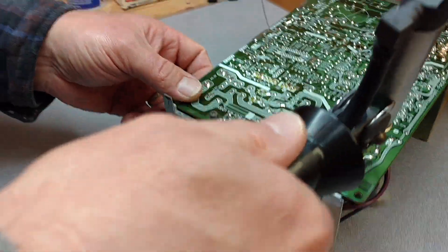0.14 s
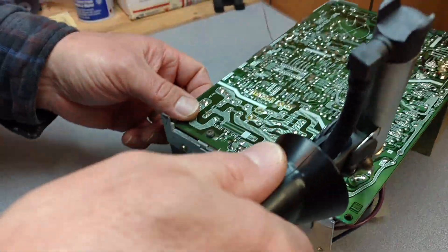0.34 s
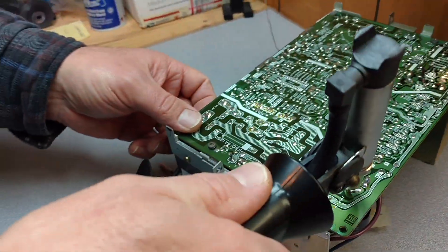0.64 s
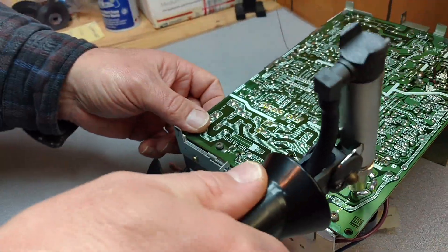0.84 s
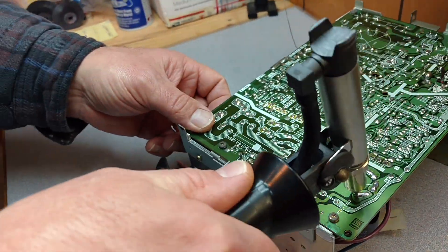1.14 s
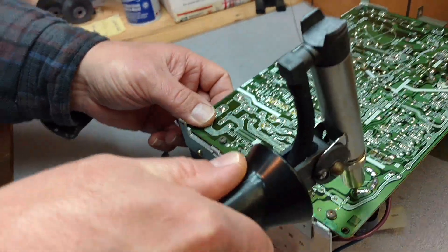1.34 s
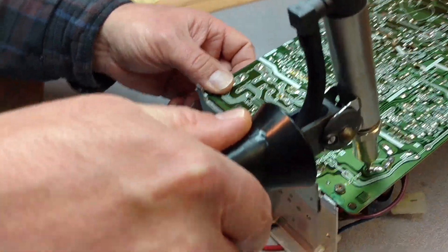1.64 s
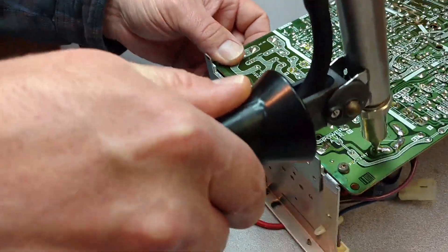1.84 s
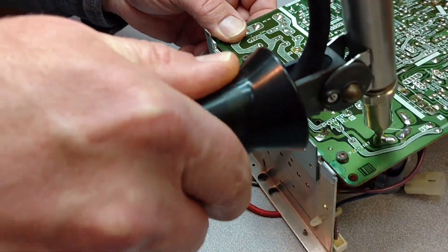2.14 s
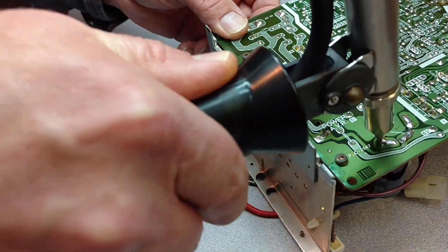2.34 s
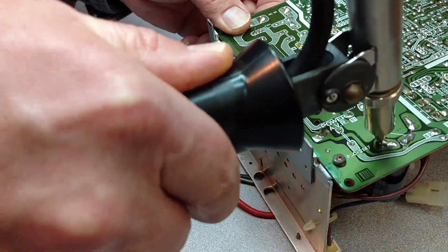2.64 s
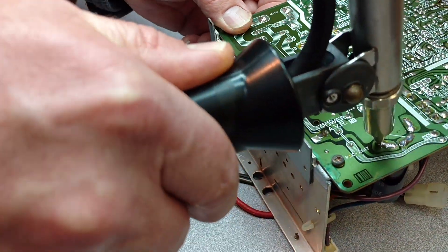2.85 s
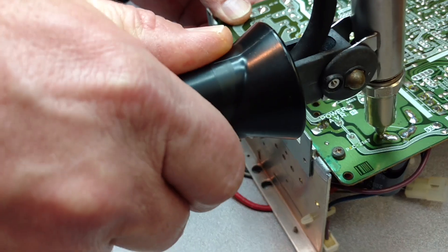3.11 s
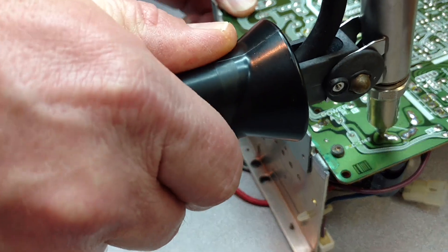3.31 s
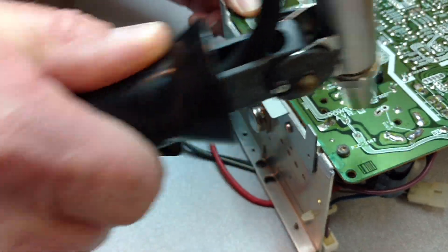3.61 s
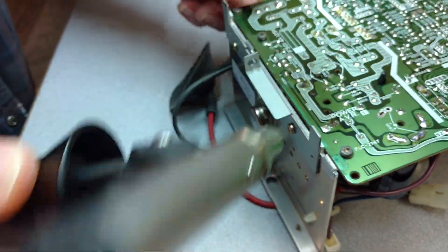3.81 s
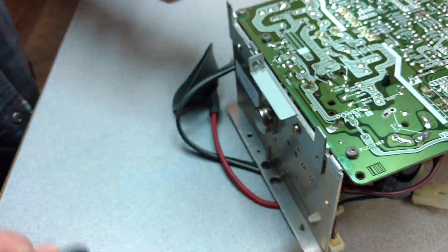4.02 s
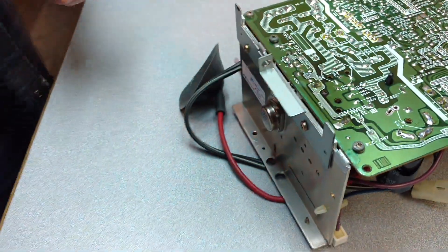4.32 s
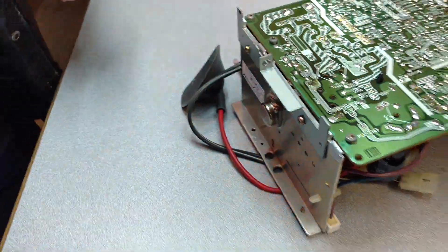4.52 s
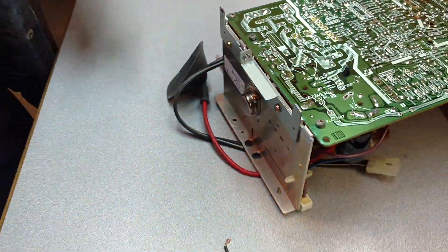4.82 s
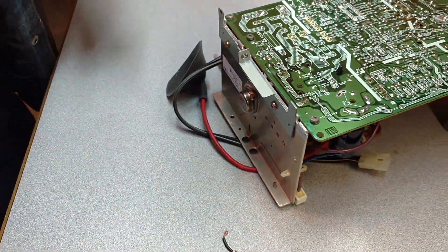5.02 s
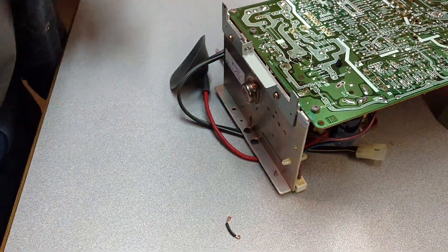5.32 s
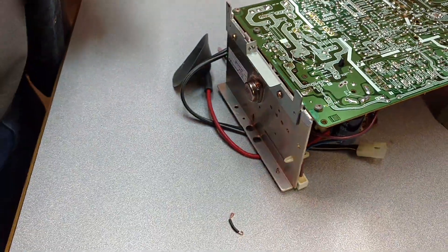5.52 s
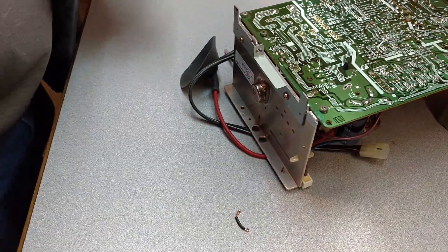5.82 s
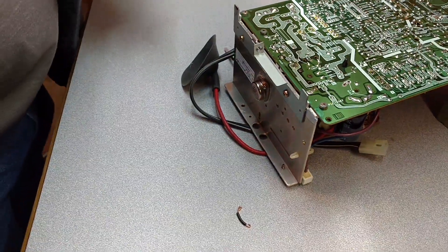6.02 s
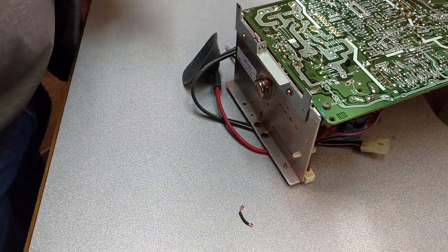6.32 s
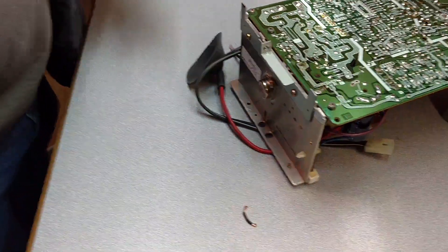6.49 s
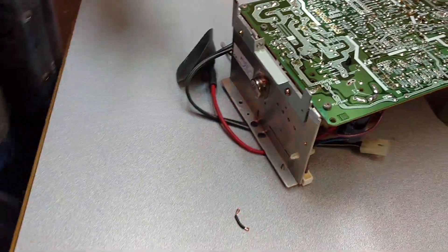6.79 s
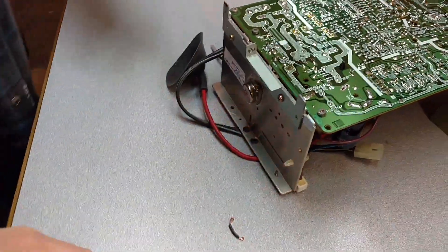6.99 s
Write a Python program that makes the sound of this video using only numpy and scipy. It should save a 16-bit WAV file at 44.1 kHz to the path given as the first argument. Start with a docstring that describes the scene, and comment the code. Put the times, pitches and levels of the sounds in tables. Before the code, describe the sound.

Close stereo microphones at a workbench in a small, dry room. From 0 s a desoldering gun's pump drones at about 52 strokes a second, a low, nasal buzz with fluttering puffs of valve air, over a fan's tonal rush and mains hum. Faint solder ticks come at 0.2, 0.5 and 1.4 s. At 3.06 s the solder tears loose in a bright, crackling slurp with a gush of air; the pump slows slightly and turns to a looser double slap. A very sharp, thin snap at 3.36 s ducks everything, which creeps back amid airy hiss and high whistles. At 4.5 s the draught chokes; the pump's resonance sweeps upward and it labours, speeding up. Hard metallic knocks at 5.7 s, lighter ones at 5.85, then a clatter and short falling skid at 6.1-6.25 as the motor switches off and coasts down, stopping by 6.4. Fan and hum remain; from 6.7 s a sleeve rubs grainily over the bench until the end.

```python
"""At a workbench, close stereo microphones hear a desoldering gun's pump throb some 52 strokes a second,
its nozzle sealed on a joint; a fan's rush and a mains hum lie behind. The solder slurps away, the nozzle snaps
off the lead and hisses open, then clogs and the pump loads up. The gun clatters into its stand, the motor
coasts down and a sleeve slides over the bench. Pump and valves are pulse trains, air is coloured noise,
knocks are cracks with rings; a limiter ducks everything at each sharp crack and creeps back."""
import sys
import numpy as np
from scipy import signal
from scipy.fft import rfft, irfft
from scipy.io import wavfile
from scipy.ndimage import uniform_filter1d, minimum_filter1d

SR = 44100
rng = np.random.default_rng(int(sys.argv[2]) if len(sys.argv) > 2 else 0)


def materialize(psi):
    """Save the field psi as 16-bit PCM at rate SR to the path in sys.argv[1].

    A 1-D psi becomes a single channel; in a 2-D psi each row is a channel.
    """
    bounded = np.clip(np.atleast_2d(psi).T, -1, 1)
    quanta = np.round(bounded * 32767).astype(np.int16)
    wavfile.write(sys.argv[1], SR, quanta)


N = 315315
TIME = np.arange(N) / SR  # s

# the solder lets go, the nozzle clogs, the gun is in its stand, the motor is switched off, strokes end (s)
FREED_S, CLOG_S, PARKED_S, OFF_S, STOP_S = 3.065, 4.48, 5.72, 6.2, 6.39


def amp(db):
    """Decibels to gain."""
    return 10 ** (np.asarray(db) / 20)


def evened(x):
    """Scales to rms 1."""
    return x / np.sqrt(np.mean(x ** 2) + 1e-20)


def curve(rows, t=TIME, axis=1):
    """One column of a table, read at times t."""
    rows = np.array(rows, float)
    return np.interp(t, rows[:, 0], rows[:, axis])


def read(points, hz):
    """A spectrum, read on a log-frequency axis."""
    f, value = np.transpose(points)
    return np.interp(np.log(hz + 1), np.log(f + 1), value)


def ramp(x, start, span):
    """Rises from 0 to 1 as x goes from start to start + span."""
    return np.clip((x - start) / span, 0, 1)


def since(s):
    """Seconds gone by since s, zero before it."""
    return np.maximum(TIME - s, 0)


def add(mix, s, sound):
    """Mixes a stereo sound in at time s."""
    part = mix[:, round(s * SR):][:, :sound.shape[1]]
    part += sound[:, :part.shape[1]]


def drift(hz):
    """Slow random wander of rms 1, its spectrum falling off around hz."""
    f = np.fft.rfftfreq(N, 1 / SR)
    smooth = np.exp(-(f / hz) ** 2)
    return evened(irfft(rfft(rng.standard_normal(N)) * smooth, N))


# likeness of the two microphones in coloured noise: pitch_hz, correlation
LIKENESS = [(50, 0.098), (130, 0.78), (400, 0.82), (1300, 0.95), (2300, 0), (15000, 0)]
# lean of coloured noise to one side: pitch_hz, left_minus_right_db
LEAN = [(100, -9.5), (220, -14), (700, -0.5), (2400, -1), (5000, 0.5), (12000, 3)]


def noise(colour, size=N):
    """Coloured noise, partly shared by the two microphones; 0 dB over the whole band gives an rms near 1."""
    hz = np.fft.rfftfreq(size, 1 / SR)
    a, b = rfft(rng.standard_normal((2, size)))
    same = np.clip(read(LIKENESS, hz), -1, 1)
    lean = amp(read(LEAN, hz) / 2)
    left = a * lean
    right = (same * a + np.sqrt(1 - same ** 2) * b) / lean
    return irfft(np.array([left, right]) * amp(read(colour, hz)), size)


def narrow(hz, width_hz, size=N):
    """Stereo noise through one resonance, of rms 1."""
    off = (np.fft.rfftfreq(size, 1 / SR) - hz) / (width_hz / 2)
    return evened(irfft(rfft(rng.standard_normal((2, size))) / (1 + off ** 2), size))


def sing(rows):
    """Fuzzy tones, each a narrow noise band that swells, glides and fades."""
    out = np.zeros((2, N))
    for start, end, hz, glide_hz, width_hz, db in rows:
        size = int((end - start) * SR)
        glide = np.exp(2j * np.pi * np.cumsum(np.linspace(0, glide_hz, size)) / SR)
        tone = (signal.hilbert(narrow(hz, width_hz, size)) * glide).real
        swell = np.sin(np.linspace(0, np.pi, size))
        add(out, start, amp(db) * tone * swell)
    return out


def causal(db):
    """Spectrum of the promptest (minimum-phase) ring that has this colour."""
    log_gain = np.log(amp(np.r_[db, db[-2:0:-1]]))
    return np.exp(np.conj(signal.hilbert(log_gain)))[:len(db)]


EDGE_HZ = 15750  # upper edge of the recorded band
EMPHASIS_HZ, METER_S = 3300, .003  # where the treble starts to count extra; averaging time


def loudness(x):
    """Running level over a few milliseconds, the treble counting extra."""
    hz = np.fft.rfftfreq(x.shape[1], 1 / SR)
    weight = np.hypot(1, (hz / EMPHASIS_HZ) ** 2) * (hz < EDGE_HZ)
    sharp = irfft(rfft(x) * weight, x.shape[1])
    power = uniform_filter1d((sharp ** 2).mean(0), size=round(METER_S * SR), mode="constant")
    return np.sqrt(abs(power) + 1e-12)


def blow(colour, t60, tilt_db, crack, crack_s=0.0013, rise_s=0.0014, size=16384):
    """A sharp crack and a dense ring that builds and dies, of peak about 1."""
    t, hz = np.arange(size) / SR, np.fft.rfftfreq(size, 1 / SR)
    ring = amp(-60 * t / t60) * (1 - np.exp(-t / rise_s))
    burst = noise([(20, 0), (20000, 0)], size=size) * (ring + crack * np.exp(-t / crack_s))
    tilt = tilt_db * np.log2(np.maximum(hz, 1000) / 1000)
    sound = irfft(rfft(burst) * causal(read(colour, hz) + tilt))
    return sound / np.sort(abs(sound).ravel())[-6]  # a few stray samples may go above 1


def workshop(x, t60=0.15, wet_db=-14):
    """A short diffuse tail of decaying noise from the small room."""
    t = np.arange(SR // 3) / SR
    tail = rng.standard_normal((2, len(t))) * amp(-60 * t / t60) * (t > .006)
    tail /= np.linalg.norm(tail[0])
    return x + amp(wet_db) * signal.oaconvolve(x, tail, axes=1)[:, :N]


# colour of the fan's rush: pitch_hz, relative_db
FAN = [(25, -30.5), (70, -21.5), (110, -5.5), (170, -6.5), (250, 2.5), (330, -6), (600, -12.5), (810, -6.5),
       (1000, -12), (1500, -26), (2200, -24), (4000, -28), (8000, -31.5), (15000, -47.5)]
# tones of the fan: pitch_hz, width_hz, level_db (over FAN_DB)
FAN_TONES = [(249.2, 7.4, -6), (347.5, 5.8, -8.5), (523, 11, -12.5), (791.3, 15, -12)]
# mains hum as the microphone moves: time_s, level_db (before the left-right offsets)
HUM = [(0, -37), (1.2, -37.5), (2.2, -34), (4.2, -36), (6.2, -37.5), (6.8, -39.5)]
FAN_DB = -33  # reference for the rush and the tones


def background(hum_hz=120, waver_db=0.5, rush_db=-2):
    """A fan's noisy rush with its resonant tones, and the sine hum of a transformer."""
    hum = np.sin(2 * np.pi * hum_hz * TIME) * amp(curve(HUM) + waver_db * drift(1.8))
    rush = amp(rush_db) * evened(noise(FAN))
    tones = sum(amp(db) * narrow(hz, width) for hz, width, db in FAN_TONES)
    return (rush + tones) * amp(FAN_DB) + hum * amp([[-2], [1.5]])  # left, right dB


# colour of the sleeve's rub: pitch_hz, relative_db
SLEEVE = [(40, -7), (250, -2), (900, 2.5), (1500, 3), (1850, -8), (2200, 1), (3200, -1.5), (3850, 1),
          (4700, 0), (6500, -6.5), (10000, -14.5), (15000, -32)]
# sleeve on the bench: time_s, level_db (before slide_db)
SLIDE = [(6.7, -44), (6.836, -44), (7.15, -34.5)]
# bench top and board ringing under the sleeve: start_s, end_s, pitch_hz (first), glide_hz, width_hz, level_db
SCRAPES = [(6.79, 6.86, 875, 9, 60, -32), (6.81, 6.84, 7300, 2, 6100, -39.5),
           (6.76, 7.3, 1875, -83, 140, -42), (6.72, 6.97, 4000, -200, 1000, -41),
           (6.93, 7.22, 3800, 5, 130, -37.5), (7.03, 7.08, 4600, -3, 5900, -32),
           (7.1, 7.135, 1500, 5, 900, -34)]


def sleeve(grain_db=0.5, slide_db=7):
    """Cloth catches and slips on the bench top: grainy noise and short resonant scrapes."""
    begin = ramp(TIME, SLIDE[0][0], 0.1)
    rub = noise(SLEEVE) * begin * amp(curve(SLIDE) + slide_db)
    return (rub + sing(SCRAPES)) * amp(grain_db * drift(120))


COAST_S = 0.2  # time constant of the motor's run-down


def spin():
    """Share of its speed that the motor keeps once it is switched off."""
    return np.exp(-since(OFF_S) / COAST_S)


# motor speed, quick under vacuum, slower in free air, sagging as the clog bites: time_s, strokes_hz (before coasting)
SPEED = [(0, 51.68), (.5, 51.88), (2.5, 51.98), (3.06, 52.15), (3.13, 50.3), (3.3, 49.15), (3.55, 49.33),
         (4.46, 49.37), (4.54, 48.65), (4.75, 49.1), (5, 50.25), (5.2, 50.95), (5.52, 51.7), (5.66, 52.3),
         (5.8, 52.05), (6.2, 52.2)]


def crank():
    """Turns of the crank so far, the running sum of the stroke rate."""
    return .65 + np.cumsum(curve(SPEED) * spin()) / SR


JOINT_VACUUM = (.752, .852)  # on the joint, first and last (0-1)
VENT_S, BUILD_S = .139, .912  # time constants of venting, and of building behind a clog


def vacuum():
    """It creeps up on the sealed joint, vents when the solder lets go, and builds again behind the clog."""
    held = np.interp(TIME, [0, FREED_S], JOINT_VACUUM) * np.exp(-since(FREED_S) / VENT_S)
    return held + 1 - np.exp(-(since(CLOG_S) / BUILD_S) ** 2)


CHOKE_FROM, CHOKE_SPAN = 0.13, 0.21  # range of vacuum over which the pump starts to labour


def labour():
    """How hard the pump works: 1 against a sealed or choked nozzle, 0 in free air."""
    return (TIME < FREED_S) + (TIME > CLOG_S) * ramp(vacuum(), CHOKE_FROM, CHOKE_SPAN)


# colour of the nozzle air: pitch_hz, relative_db
HISS = [(600, -21), (1800, 1.5), (2600, -1), (3800, 6), (5200, 5.5), (7000, 2), (9000, 5), (11000, -0.5),
        (13000, -5), (15500, -16)]
# whistles and hiss bands at the nozzle's edge: start_s, end_s, pitch_hz (first), glide_hz, width_hz,
# level_db (before throb and warble)
WHISTLES = [(1.8, 3.3, 1710, 0.5, 380, -44), (3.04, 3.17, 3720, 5.5, 300, -31.5),
            (3.1, 3.42, 3550, 0, 900, -48), (3.05, 3.56, 14800, -300, 1800, -40),
            (3.46, 3.56, 9900, -1300, 600, -34.5), (3.51, 3.66, 14400, -500, 850, -29.5),
            (3.6, 4.58, 13800, -300, 1220, -47), (3.65, 4.35, 11800, 197, 500, -52),
            (4.0, 4.18, 11900, 96, 400, -38), (4.02, 4.2, 13400, 700, 500, -40),
            (4.15, 4.5, 4000, 0, 900, -45), (4.36, 4.51, 4050, -2, 700, -45),
            (3.06, 3.42, 11700, 2, 2500, -45)]
DRAW_DB, GUSH_DB, GUSH_S = -36, 15, 0.089  # open nozzle, extra in the first gush, its time constant
PLUG_DB, PLUG_DB_PER_S, PLUG_S = -7, -14, 0.03  # the forming clog cuts the draught, then ever more; forming time


def nozzle(turns, throb=0.12, whistle_throb=0.7, flutter_db=1, warble_db=3.0, tear_s=0.023, delay=0.49):
    """Air gushes in as the solder tears off, rushes with each stroke and whistles on the hole's edge."""
    level = DRAW_DB + GUSH_DB * np.exp(-since(FREED_S) / GUSH_S) * (TIME > FREED_S)
    level += PLUG_DB * ramp(TIME, CLOG_S, PLUG_S) + PLUG_DB_PER_S * since(CLOG_S)
    stroke = np.cos(2 * np.pi * (turns - delay))
    opening = ramp(TIME, FREED_S - tear_s, tear_s)
    air = noise(HISS) * amp(level + flutter_db * drift(38)) * opening * (1 + throb * stroke)
    return air + sing(WHISTLES) * (1 + whistle_throb * stroke) * amp(warble_db * drift(30))


# the barrel skidding down the stand: start_s, end_s, pitch_hz (first), glide_hz, width_hz, level_db
SKID = [(6.213, 6.246, 1400, -850, 300, -16)]


def skid():
    """The barrel skids down the stand with a falling scrape, a gliding noise band."""
    return sing(SKID)


# colour of the snap: pitch_hz, relative_db
SNAP = [(300, -5), (1200, -4), (3000, 3.5), (4500, 1), (9000, -1), (15500, -15)]
SNAP_S, SNAP_DB, SNAP_T60_S = 3.36, 12.5, 0.0053  # time, loudness, ring


def lift_off(crack=3):
    """The nozzle comes off the lead with a thin snap, a crack with a very short ring."""
    out, snap = np.zeros((2, N)), blow(SNAP, SNAP_T60_S, 0, crack)
    add(out, SNAP_S, amp(SNAP_DB) * snap / loudness(snap).max())
    return out


# solder spitting up the tube: start_s, loudness_db, ring_t60_s, treble_tilt_db (per octave), crack_hardness
SPITS = [(.16, -23.5, 0.093, -9.5, 2.5), (0.548, -29, 0.03, -11, 1), (1.353, -29, 0.019, -2, 1.5),
         (3.062, 8.5, 0.075, -2, 2.2), (3.077, -8, .03, -5.5, 2), (3.086, -7, 0.09, -5.5, 1.6),
         (3.111, -15.5, .04, -8, 1.5), (3.128, -16, 0.033, -4, 1.6)]
# colour of a spit before tilt: pitch_hz, relative_db
SPIT = [(300, -31), (1000, -6.5), (1700, -0.5), (2600, 2), (3800, 1), (5000, -2.5), (6600, -1.5),
        (9500, -5), (15500, -20.5)]


def solder():
    """Beads of solder are torn off the joint and rattle up the tube, each a crack and a ring."""
    out = np.zeros((2, N))
    for s, db, t60, tilt_db, crack in SPITS:
        spit = blow(SPIT, t60, tilt_db, crack)
        add(out, s, amp(db) * spit / loudness(spit).max())
    return out


# gun knocking against its stand: start_s, loudness_db, ring_t60_s, treble_tilt_db (per octave),
# crack_hardness, favoured_pitch_hz
KNOCKS = [(5.678, 6, 0.075, 0.5, 4.6, 900), (5.685, -4.5, 0.065, -0.5, 1.5, 1700),
          (5.691, -6, 0.077, -2, 1.5, 1090), (5.702, -12, 0.072, -3, 0.88, 1400),
          (5.835, -9.5, 0.067, -2, 0.87, 1220), (5.847, -12.5, 0.047, -2, 2.7, 1180),
          (6.125, -12.5, 0.11, -2, 1, 1140), (6.164, -10.5, 0.058, 0, 0.89, 1700),
          (6.171, -5, 0.078, 0, 1.2, 1160), (6.177, -17, 0.062, -3, 1, 620),
          (6.208, -10, 0.12, 5.5, 0.63, 1700), (6.219, -4, 0.075, -2, 2.9, 970),
          (6.237, -20.5, .04, -5, 1, 620), (6.252, -11.5, 0.045, -7.5, 1.7, 1170)]
# colour of a knock before tilt: pitch_hz, relative_db
KNOCK = [(60, -20), (250, -6.5), (600, -2), (1100, -3), (1800, -5.5), (2400, -5), (3900, -8.5),
         (5200, -11.5), (6500, -16), (9000, -29), (15500, -35.5)]
# modes of the metal stand: pitch_hz, relative_db (before focus and tilt), ring_t60_s
STAND = [(623, 3.9, .06), (852, 4.2, 0.06), (1010, 9.5, 0.044), (1168, 7.9, 0.046), (1290, 1.5, 0.074),
         (1696, 2, 0.052), (2840, 2.8, 0.053), (3914, 6.3, 0.044)]


def stand(ring_db=-6, rise_s=0.00074, focus_db=12, focus_octaves=0.21):
    """The gun knocks into its metal stand; each point of contact favours the modes near one pitch."""
    out, t = np.zeros((2, N)), np.arange(16384) / SR
    for s, db, t60, tilt_db, crack, favoured_hz in KNOCKS:
        ring = 0
        for hz, mode_db, life in STAND:
            octaves_off = np.log2(hz / favoured_hz)
            mode_db += focus_db * np.exp(-(octaves_off / focus_octaves) ** 2)
            mode_db += tilt_db * np.log2(max(hz / 1000, 1))
            phase = rng.uniform(-1, 1) + rng.uniform(-.45, .45, (2, 1))  # nearly alike at both microphones
            ring += amp(mode_db - 60 * t / life) * np.sin(2 * np.pi * hz * t + phase)
        ring *= 1 - np.exp(-t / rise_s)
        ring *= amp(ring_db - 2 * tilt_db) / abs(ring).max()  # soft blows are mostly ring
        knock = blow(KNOCK, t60, tilt_db, crack) + ring
        add(out, s, amp(db) * knock / loudness(knock).max())
    return out


# colour of the valve air: pitch_hz, relative_db
PUFF = [(150, -14), (350, 8.5), (600, 10), (1050, 9.5), (1400, -0.5), (1800, -2), (2300, -4), (3800, -9),
        (5000, -13), (7500, -22), (10000, -31), (15000, -45)]
# the pump's place as the microphone moves: time_s, left_minus_right_db, nearness_db
PLACE = [(0, -1.5, -1.5), (1.1, -1.5, 0.5), (2.7, 1.5, 0), (3.3, 3, 0), (5.15, 2.5, 0), (5.7, 1, 2),
         (6.2, 1.5, 1.5)]
PUFF_DB, PUFF_LABOUR_DB, PUFF_VENT_DB = -33.5, 2.5, 11.5  # free air, extra when choked, extra per vacuum vented


def valves(turns, leak=0.23, open_share=0.69, delay=0.346, uneven_db=4.5, coast_db=42,
           rattle_hz=17.5, rattle_db=4.0):
    """A puff of air, a decaying gate on noise, follows every stroke, no two equally strong."""
    cycle = np.maximum(turns - delay, 0)
    strength = amp(uneven_db * (2 * rng.random(N) - 3.0))[cycle.astype(int)]  # a new size each stroke
    puffs = leak + strength * np.exp(-(cycle % 1) / open_share)
    gate = evened(uniform_filter1d(puffs, size=64))  # the edges of each puff are softened
    # on the sealed joint the puffs surge every third stroke or so
    rattle = rattle_db * np.sin(2 * np.pi * rattle_hz * TIME + drift(17.0))
    rattle *= curve([(1, .4), (2.1, 0.77)]) * (TIME < FREED_S)
    venting = vacuum() * (TIME > FREED_S) * (TIME < CLOG_S)
    level = PUFF_DB + PUFF_LABOUR_DB * labour() + PUFF_VENT_DB * venting
    level += curve(PLACE, axis=2) - coast_db * (1 - spin())
    return noise(PUFF) * gate * amp(level + rattle)


# delay through the housing, before each ring's lag_share: pitch_hz, delay_s
LAG = [(250, 0.00038), (450, 0.0035), (600, 0.0026), (850, 0.00728)]


def stroke_ring(orders, rate_hz, lag_share, lead, balance, size=4096):
    """One stroke at the two microphones; a train of them has rms near 1 around the main resonance."""
    hz = np.fft.rfftfreq(size, 1 / SR)
    tops = [(k * rate_hz, db) for k, db in enumerate(orders, 1)]
    db = read([(7.7, -42.5)] + tops + [(1750, -61.0), (2400, -80.5), (6000, -88.5)], hz)
    ratio = amp(read(balance, hz))
    turn = np.exp(.5j * lead * np.minimum(hz / 450, 1))
    pair = np.array([ratio * turn, 1 / turn]) * 2 / (1 + ratio)
    spread = np.exp(-2j * np.pi * lag_share * np.cumsum(read(LAG, hz)) * hz[1])
    main = (hz > 330) & (hz < 560)
    power = np.sum(amp(db[main]) ** 2) * 2 / size * rate_hz / SR
    ring = np.roll(irfft(causal(db) * pair * spread), size // 32, axis=1)
    return ring * signal.windows.tukey(size, .04) / np.sqrt(power)


# the two valves while air flows: time_s, gap_s, early_slap_db, late_slap_db
SLAPS = [(3.1, 0.0043, 2.5, -3.5), (3.2, 0.0055, -3.5, 1.5), (3.4, 0.00718, -1.5, -1.5),
         (4.48, 0.0075, -0.5, -2), (4.6, .00583, -2, 0.5), (4.75, 0.0048, -3, 0.5), (4.9, 0.0034, -5, 2),
         (5.05, 0.0029, 3, 3.5), (5.3, 0.0028, -2, 3.5)]


def double_slap(first, second, s):
    """One valve slaps after the other; as the gap closes, a comb of resonances sweeps upward."""
    gap_s, first_db, second_db = [curve(SLAPS, s, axis=k) for k in range(1, len(SLAPS[0]))]
    return amp(first_db) * first + amp(second_db) * np.roll(second, round(gap_s * SR), axis=1)


# rings of one stroke on the sealed joint, choked, and parked in the stand: level_db at 1, 2, 3.. times the stroke rate
SEALED = [-26.5, -39, -16.5, -12.5, -11, -7, -6, -1, 4, -7.5, -15, -13, -25.5, -14.5, -16, -52, -14.5, -20,
          -19.5, -12.5, -27.5, -21.5, -36, -23.5]
CHOKED = [-24, -31, -17, -6.5, -6.5, -3.5, -5, -3.5, 7.5, -2, -33, -12.5, -13, -6.5, -13, -8.5, -46, -10.5,
          -8, -18, -36, -5, -44, -11.5, -12.5, -26, -33]
PARKED = [-26, -21, -13.5, -15, -11, -4.5, -10.5, -2.5, 8, -13.5, -18, -23, -13, -30, -18, -27.5, -34.5,
          -33, -15, -9.5, -32, -12, -16.5, -19.5]
# rings of the two valve slaps while air flows: level_db at 1, 2, 3.. times the stroke rate
EARLY_SLAP = [-41, -12.5, 2.5, -2, -3, 2, 1, -1, 9, 2, 2, -2.5, -2, -9.5, -6.5, -4, -36, 3.5, -14, -27, 3.5,
              -39, -38, -33, -32, -4.5, -40]
LATE_SLAP = [-20, -7.5, 3.5, 3.5, 0.5, -5.5, 3, 2.5, 3.5, 7, -4.5, 1, -3, -1.5, 1, -1, -21, -5.5, -12, -2.5,
             -7, -8.5, -11.5, -11, -15.5, -29, -23.5, -11.5]
# the five rings in that order: levels, strokes_hz, lag_share, left_lead_rad (from 450 Hz up),
# balance (pitch_hz, left_minus_right_db)
RINGS = [(SEALED, 52, 0.79, 0.94, [(200, -13.5), (420, -7.5), (750, -2)]),
         (CHOKED, 51.2, 0.17, 0.84, [(200, -14), (450, -1.5)]), (PARKED, 52.2, 0.598, 1, [(200, -10),
         (450, -2.5)]), (EARLY_SLAP, 49.3, 0, 0.85, [(250, -11.5), (700, -5.5)]),
         (LATE_SLAP, 49.6, 0, 0.77, [(250, -9), (700, -1.5)])]
PUMP_DB, LABOUR_DB = -29, 6.5  # a stroke in free air; extra for the merged strokes
JITTER_S = .00002  # rms unevenness of stroke timing
MERGE_S, MERGE_SPAN_S = 5.12, 0.22  # when the two slaps start to merge into the choked ring, and how long it takes
PARKING_S = 0.43  # time the gun takes to slide into its stand


def pump(turns, uneven_db=0.23, coast_db=18, leak_span=0.65):
    """Each crank turn rings the housing: two slaps while air flows, one merged stroke under vacuum."""
    at = np.interp(np.arange(1, turns[-1]), turns, TIME)
    at = at[at < STOP_S]
    merged = ramp(TIME, MERGE_S, MERGE_SPAN_S)
    parking = ramp(TIME, PARKED_S - PARKING_S, PARKING_S)
    leaked = ramp(1 - spin(), 0, leak_span)
    # neighbouring states blend
    sealed_share = TIME < FREED_S
    choked_share = merged * (1 - parking)
    parked_share = parking * (1 - leaked)
    slap_share = (TIME >= FREED_S) * (1 - merged) + leaked
    shares = np.array([sealed_share, choked_share, parked_share, slap_share]) ** 0.86
    level = PUMP_DB + curve(PLACE, axis=2) - coast_db * (1 - spin())
    *single, first, second = [stroke_ring(*ring) for ring in RINGS]
    merged_rings = [amp(LABOUR_DB) * ring for ring in single]
    out = np.zeros((2, N))
    for s, (late, strong) in zip(at, rng.standard_normal((len(at), 2))):
        now = round(s * SR)
        rings = np.array(merged_rings + [double_slap(first, second, s)])
        stroke = np.tensordot(shares[:, now], rings, 1)
        add(out, s + JITTER_S * late, amp(level[now] + uneven_db * strong) * stroke)
    return out * amp(np.outer([.7, -.3], curve(PLACE)))


def scene():
    """The crank drives the pump, the valves and the draught; the clatter rings in the room."""
    turns = crank()
    clatter = solder() + lift_off() + stand() + skid()
    return background() + sleeve() + nozzle(turns) + workshop(clatter) + valves(turns) + pump(turns)


LIMIT_DB, RECOVER_DB_PER_S = -6.5, 10  # the recorder's limiter


def limiter(x):
    """Turns the gain down at once on anything too loud, and lets it back up slowly."""
    over_db = np.maximum(20 * np.log10(loudness(x)) - LIMIT_DB, 0)
    recovery = RECOVER_DB_PER_S * TIME
    duck_db = np.maximum.accumulate(over_db + recovery) - recovery
    return x * amp(uniform_filter1d(minimum_filter1d(-duck_db, size=64), size=32))


NOTCH_HZ, NOTCH_SPACING_HZ = 2520, 2650  # a dip of the mid, and the step to the next


def record(dry, depth=0.92):
    """The limiter; stereo widening that combs mid and side in opposite ways; then the band limit."""
    hz = np.fft.rfftfreq(N, 1 / SR)
    left, right = limiter(dry)
    treble = np.clip(hz / 700 - 1.4, 0, 1)
    comb = min(depth, 1) * np.cos(2 * np.pi * (hz - NOTCH_HZ) / NOTCH_SPACING_HZ) * treble
    mid = irfft(rfft(left + right) * np.sqrt(1 - comb), N) / 2
    side = irfft(rfft(left - right) * np.sqrt(1 + comb), N) / 2
    wide = np.clip([mid + side, mid - side], -1, 1)
    low_pass = signal.firwin(511, EDGE_HZ, window=("kaiser", 9), fs=SR)
    return signal.oaconvolve(wide, low_pass[None], "same", axes=1)


dry = scene()
out = record(dry)
materialize(out)
```